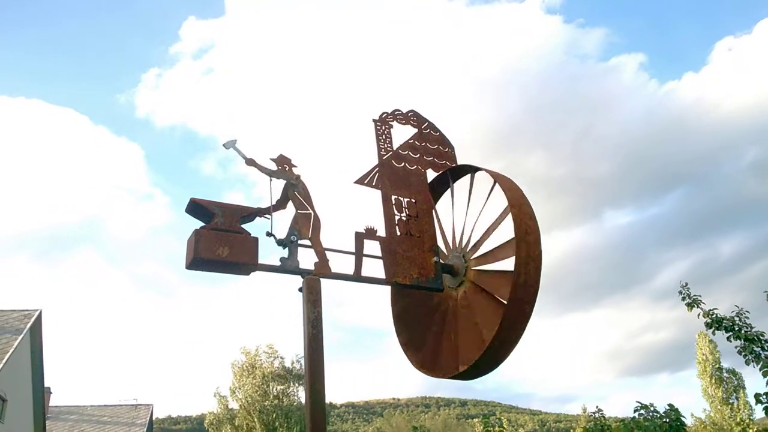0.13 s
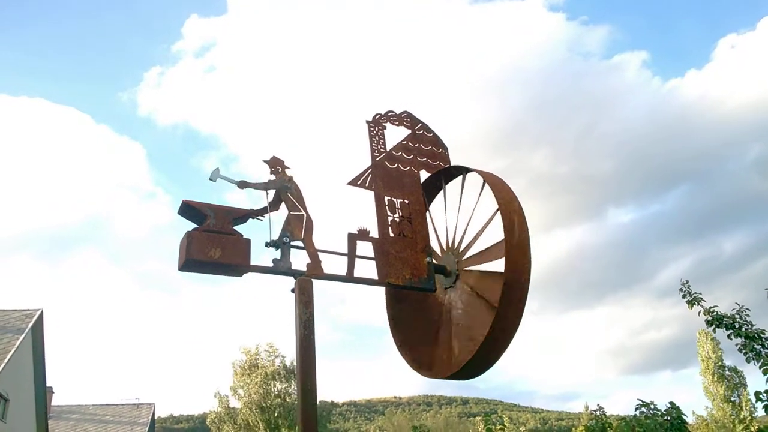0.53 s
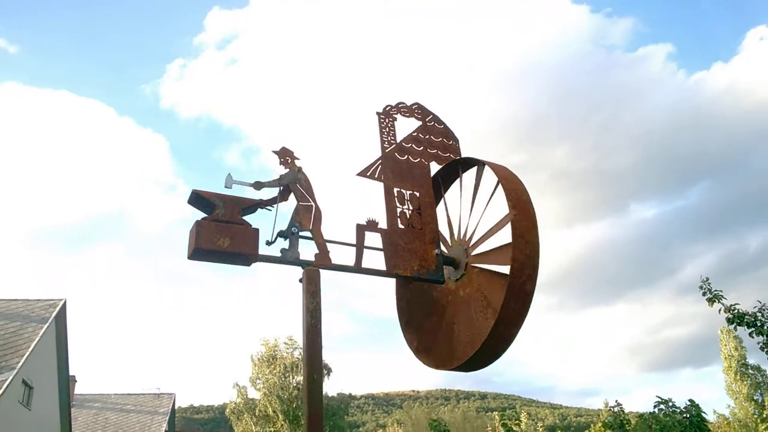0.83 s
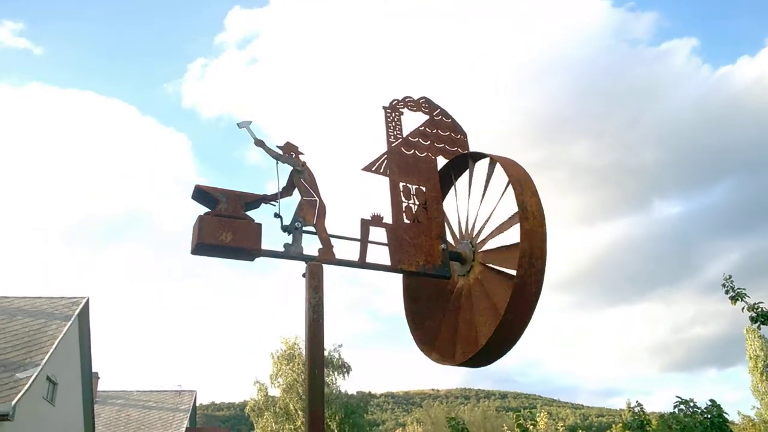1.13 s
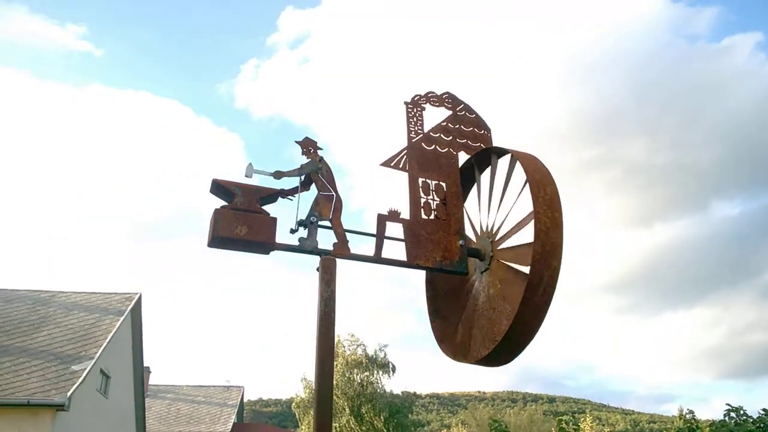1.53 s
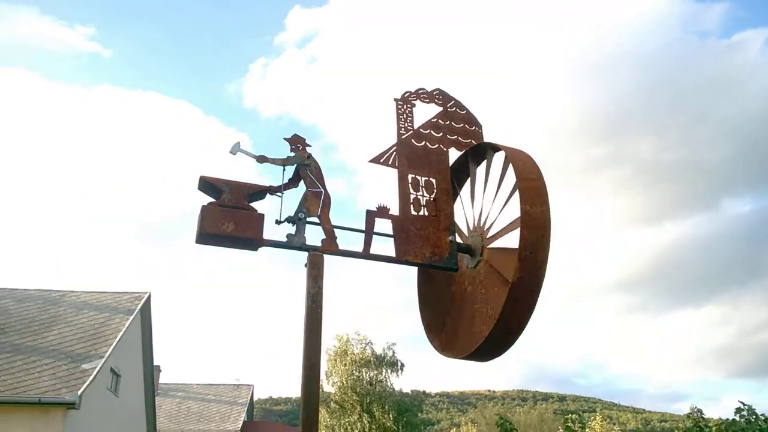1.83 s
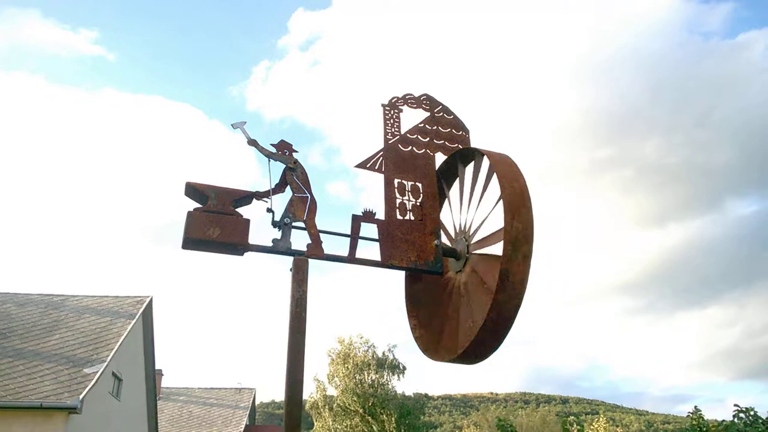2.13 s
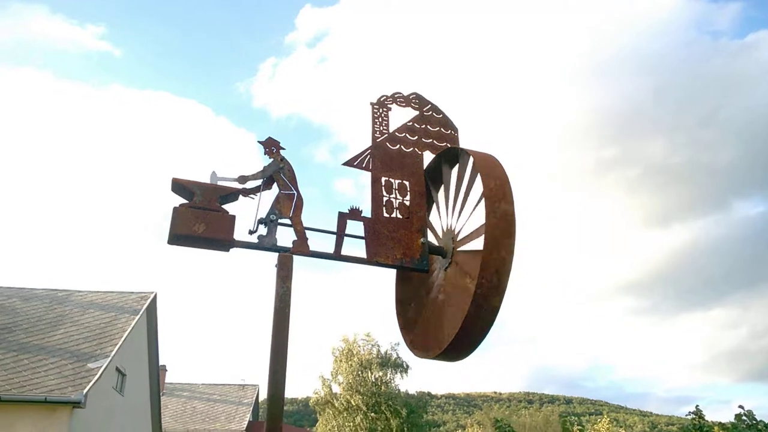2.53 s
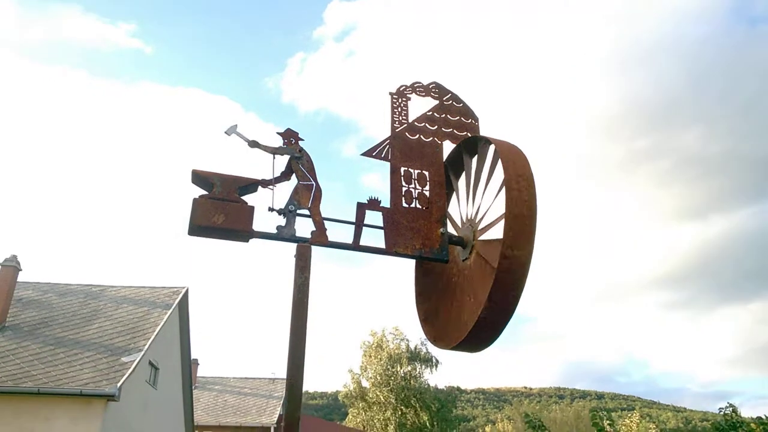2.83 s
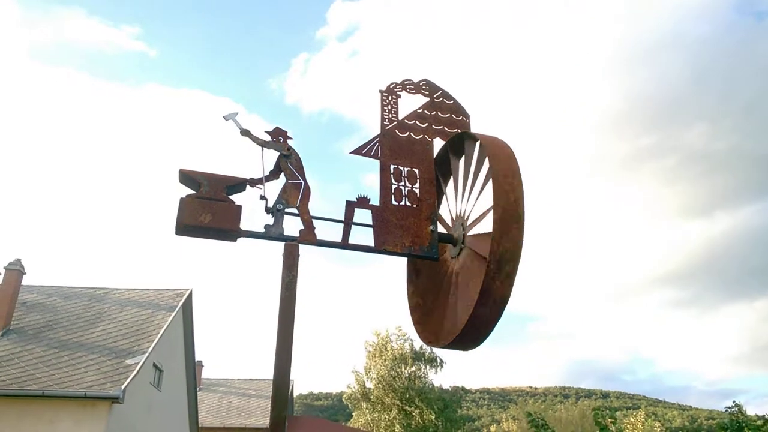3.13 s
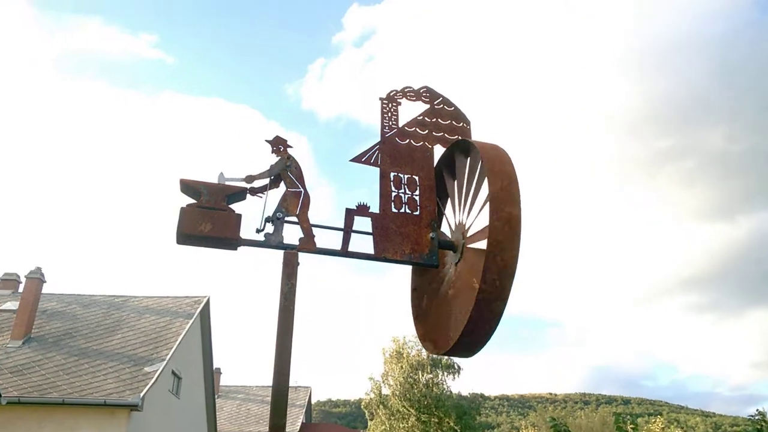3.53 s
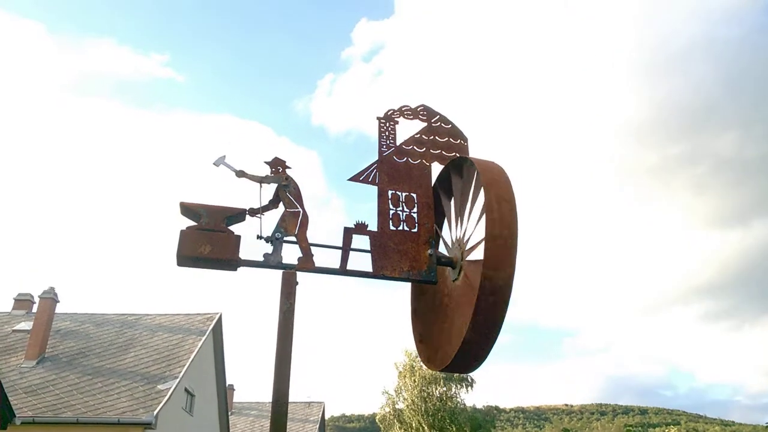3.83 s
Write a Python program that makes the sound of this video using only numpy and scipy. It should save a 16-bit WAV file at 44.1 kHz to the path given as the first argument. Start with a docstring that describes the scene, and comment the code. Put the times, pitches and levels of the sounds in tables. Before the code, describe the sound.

Gusty wind rumbles on the microphone while a rusty wind-driven garden ornament squeaks faintly.

```python
"""Gusty wind buffets the microphone in a garden and dies down: rumble, eddies, thumps, one burble.
A rusty wind-driven ornament turns about once a second: its crank scrapes faintly, then squeaks
on two close notes. Once its loose linkage ticks. Walls and trees echo the ornament faintly.
Leaves hiss softly behind."""
import sys
import numpy as np
from scipy import signal
from scipy.fft import rfft, irfft
from scipy.io import wavfile
from scipy.ndimage import uniform_filter1d

SR = 44100
rng = np.random.default_rng(int(sys.argv[2]) if len(sys.argv) > 2 else 0)


def generate_wav(signal):
    """Clip the signal to [-1, 1] and save it as 16-bit WAV at the path in sys.argv[1]."""
    frames = np.transpose(np.atleast_2d(signal))
    scaled = np.clip(frames, -1, 1) * 32767
    pcm = np.round(scaled).astype(np.int16)
    wavfile.write(sys.argv[1], SR, pcm)


N = 176400

# wind strength at the microphone (time [s], level [dB])
WIND_LEVEL = [(0, -25), (.05, -22.5), (.23, -20.5), (.28, -17), (.58, -17), (.62, -33.5), (.7, -19),
              (.76, -27), (.81, -17.5), (.88, -23.5), (1.35, -24.5), (1.44, -32.5), (1.68, -37),
              (1.75, -19.5), (1.89, -18.5), (1.96, -22), (2.25, -35.5), (2.31, -19), (2.38, -29.5),
              (2.58, -23), (2.8, -29.5), (2.85, -25), (3.08, -26.5), (3.12, -43.5), (3.42, -47.5),
              (3.53, -34), (3.72, -48), (3.82, -49.5), (4, -58)]
# wind rumble (frequency [Hz], relative density [dB])
RUMBLE_SPECTRUM = [(8, -53), (22, -6.5), (38, 9), (70, 0), (100, -5.5), (150, -23.5), (250, -33),
                   (500, -51), (1000, -107.5)]
# wind flutter (frequency [Hz], relative density [dB])
FLUTTER_SPECTRUM = [(30, -5), (90, 3), (150, 22.5), (250, -35.5), (400, -17), (700, -52.5), (1500, -89)]
# eddies hitting the microphone (centre [s], half-width [s], level [dB])
EDDIES = [(0.045, 0.075, -20), (0.265, 0.036, -21.5), (0.338, 0.073, -19.5), (0.451, 0.037, -16.5),
          (0.525, 0.037, -18.5), (0.575, 0.025, -16.5), (0.696, 0.03, -14.5), (0.729, 0.019, -19.5),
          (0.815, 0.048, -20.5), (0.944, 0.012, -19.5), (1.134, 0.013, -22.5), (1.175, 0.026, -19),
          (1.219, 0.01, -20.5), (1.319, 0.046, -28), (1.392, 0.014, -28), (1.503, 0.012, -29),
          (1.745, 0.027, -30), (1.849, 0.014, -22), (1.879, 0.026, -16), (1.909, 0.038, -22),
          (2.008, 0.035, -23.5), (2.086, 0.0064, -23.5), (2.291, 0.018, -26), (2.316, 0.0091, -28.5),
          (2.452, 0.025, -29.5), (2.566, 0.015, -22), (2.859, 0.027, -25), (2.958, 0.036, -31),
          (3.062, 0.056, -40)]
# eddy before its low-pass (frequency [Hz], relative density [dB])
EDDY_SPECTRUM = [(12, -11), (35, 1), (65, -1.5), (105, 1.5), (160, -4), (230, -8.5), (380, -13.5),
                 (520, -16), (900, -15)]
# pressure swings of the sharpest eddies (centre [s], peak [dB], strongest frequency [Hz])
PRESSURE_SWINGS = [(-.0015, -11.5, 59.6), (.041, -10.5, 71.4), (.453, -11.5, 107.5), (.571, -8, 102),
                   (.701, -9, 85), (2.594, -18.5, 78), (2.851, -17.5, 54), (2.911, -19, 68)]
# air across the microphone port (frequency [Hz], relative density [dB])
BURBLE_SPECTRUM = [(160, -30), (280, 7), (440, -3), (900, -29.5), (1500, -68)]
# crank squeaks (centre [s], half-width [s], high note [dB], low note [dB], low note lead [s])
CRANK_SQUEAKS = [(.008, 0.04, -49, -62, .027), (0.903, .034, -44, -52.5, .058),
                 (1.802, 0.041, -42.5, -57.5, 0.043), (2.739, 0.038, -50.5, -56.5, 0.048),
                 (3.729, 0.019, -55, -61, 0.045)]
# crank scrapes (centre [s], half-width [s], level [dB])
CRANK_SCRAPES = [(.7, 0.13, -56.5), (1.625, .105, -56), (2.55, .1, -58.5), (3.52, 0.18, -61.5)]
# linkage ring (frequency [Hz], relative level [dB], T60 [s])
LINKAGE_MODES = [(780, -3, .035), (1470, -10, 0.046), (2750, -9, 0.025), (3650, -7.5, 0.016),
                 (3710, -2, 0.043), (4010, 8.5, 0.011)]
# linkage impact (frequency [Hz], relative density [dB])
CRACK_SPECTRUM = [(400, -19), (800, 24.5), (2000, -2), (4200, -3), (7000, -41), (12000, -62)]
# leaf hiss (frequency [Hz], relative density [dB])
LEAF_SPECTRUM = [(30, 10.5), (90, 8), (300, 4.5), (600, 2), (1000, 0), (1400, -1.5), (1850, 3), (2400, -1),
                 (2900, -4), (3700, 1.5), (4500, -1), (5600, -3), (6800, -10.5), (8300, -16), (9300, -20.5),
                 (12000, -23), (15500, -29)]
# leaf hiss (time [s], level [dB])
LEAF_LEVEL = [(0, -52), (.4, -53.5), (.8, -53.5), (1.6, -55), (2.4, -55.5), (3.1, -55), (3.55, -55.5),
              (3.9, -57), (4, -56)]
# leaf taps (frequency [Hz], relative density [dB])
TAP_SPECTRUM = [(1500, -1), (4000, 8), (7000, -9.5), (11000, -13), (16000, -19.5)]

BREEZE_DB = -22  # reference level for flutter and eddies


def amp(db):
    """Decibels to gain."""
    return 10 ** (np.asarray(db) / 20)


def unit(x):
    """Scale to rms 1."""
    return x / np.sqrt(np.mean(x ** 2) + 1e-30)


def clock():
    """Sample times [s]."""
    return np.arange(N) / SR


def curve(points):
    """Straight lines through (time [s], value) points."""
    return np.interp(clock(), *np.transpose(points))


def spectrum_gain(spectrum, hz):
    """Gain at hz of a (frequency [Hz], level [dB]) table."""
    knots_hz, db = np.transpose(spectrum)
    return amp(np.interp(np.log(hz + 1), np.log(knots_hz), db))


def shaped(x, spectrum):
    """Filter by a spectrum; rms 1."""
    return unit(irfft(rfft(x) * spectrum_gain(spectrum, np.fft.rfftfreq(N, 1 / SR)), N))


def noise(spectrum):
    """Coloured noise, rms 1."""
    return shaped(rng.standard_normal(N), spectrum)


def drift(rate_hz):
    """Low-passed random motion, rms 1."""
    hz = np.fft.rfftfreq(N, 1 / SR)
    return unit(irfft(rfft(rng.standard_normal(N)) * np.exp(-(hz / rate_hz) ** 2), N))


def steadied(x, samples):
    """Even out slow level changes."""
    return x / np.sqrt(abs(uniform_filter1d(uniform_filter1d(x ** 2, samples), samples)) + 1e-12)


def bell(x, centre, half_width):
    """Gaussian, peak 1; 1/e^2 at half_width."""
    return np.exp(-np.minimum(2 * ((x - centre) / half_width) ** 2, 100))


def add(mix, start_s, sound):
    """Mix a sound in at start_s."""
    at = round(start_s * SR)
    sound = sound[max(-at, 0):]
    part = mix[max(at, 0):][:len(sound)]
    part += sound[:len(part)]


def wind(rumble_flicker_db=5, flutter_flicker_db=1.5, flutter_db=-47, flutter_growth=1.08):
    """Deep rumble follows the wind in uneven lumps; a higher flutter grows faster with it."""
    level_db = curve(WIND_LEVEL)
    lumps = np.clip(drift(rate_hz=18.5), -2, 1.3)
    rumble = steadied(noise(RUMBLE_SPECTRUM) * amp(rumble_flicker_db * lumps), samples=4000)
    flutter = steadied(noise(FLUTTER_SPECTRUM) * amp(flutter_flicker_db * lumps), samples=5000)
    return rumble * amp(level_db) + flutter * amp(flutter_db + flutter_growth * (level_db - BREEZE_DB))


def buffets(crossover_hz=285, crest_share=.55, breeze_cutoff_hz=255.2, db_per_octave=15, samples=16384):
    """Each eddy: a deep pressure lump with a shorter, brighter crest. Stronger ones reach higher."""
    out = np.zeros(N)
    t, hz = (np.arange(samples) - samples // 2) / SR, np.fft.rfftfreq(samples, 1 / SR)
    colour = spectrum_gain(EDDY_SPECTRUM, hz)
    highpass = hz ** 2 / (hz ** 2 + crossover_hz ** 2)
    for centre_s, width_s, db in EDDIES:
        cutoff_hz = breeze_cutoff_hz * 2 ** ((db - BREEZE_DB) / db_per_octave)
        air = rng.standard_normal(samples)
        body, crest = bell(t, 0, width_s), bell(t, 0, width_s * crest_share)
        push = rfft(air * body) * (1 - highpass) + rfft(air * crest) * highpass
        lump = irfft(push * colour / np.hypot(1, (hz / cutoff_hz) ** 4))
        add(out, centre_s + t[0], amp(db) * lump * np.linalg.norm(body) / np.linalg.norm(lump))
    return out


def thumps():
    """The sharpest eddies break on the microphone in one pressure swing: suction, then push."""
    out = np.zeros(N)
    for centre_s, db, hz in PRESSURE_SWINGS:
        phase = 2 * np.pi * hz * (clock() - centre_s)
        swing = phase / (1 + phase ** 2) ** 2
        out += amp(db) * swing / swing.max()
    return out


def burble(centre_s=1.876, width_s=.014, level_db=-20):
    """The hardest gust flutters briefly across the microphone port."""
    air = steadied(noise(BURBLE_SPECTRUM), samples=600)
    return amp(level_db) * air * bell(clock(), centre_s, width_s)


def squeal(hz, waver_hz):
    """Wavering tone of dry metal, rms 1."""
    return unit(np.sin(2 * np.pi * np.cumsum(hz + waver_hz * drift(rate_hz=74.7)) / SR))


def crank_scrapes(top_hz=4385, sag_hz=166.8, band_hz=148, tone_db=-2, flicker_db=3.5):
    """The rusty crank rubs and catches: narrow-band noise plus a squeal arching in pitch."""
    t, hz = clock(), np.fft.rfftfreq(N, 1 / SR)
    envelope = sum(amp(db) * bell(t, s, width_s) for s, width_s, db in CRANK_SCRAPES)
    arch = sum(bell(t, s, width_s) for s, width_s, _ in CRANK_SCRAPES)
    band = 1 / (1 + ((hz - top_hz + sag_hz / 4) / band_hz) ** 2)
    rub = unit(irfft(rfft(rng.standard_normal(N)) * band, N))
    tone = amp(tone_db) * squeal(top_hz - sag_hz * (1 - arch), waver_hz=48)
    catching = amp(flicker_db * np.minimum(drift(rate_hz=55), 1))
    return envelope * unit((rub + tone) * catching)


def crank_squeaks(high_hz=4293, low_hz=4178, overtone_hz=8200, overtone_db=-80, low_width_s=.062):
    """Each turn squeaks: a low note with a thin near-octave, then a clear higher note."""
    t = clock()
    high, low, overtone = np.zeros((3, N))
    for centre_s, width_s, high_db, low_db, lead_s in CRANK_SQUEAKS:
        early = bell(t, centre_s - lead_s, low_width_s)
        high += amp(high_db) * bell(t, centre_s, width_s)
        low += amp(low_db) * early
        overtone += amp(overtone_db) * early
    return (high * squeal(high_hz, waver_hz=17) + low * squeal(low_hz, waver_hz=17)
            + overtone * squeal(overtone_hz, waver_hz=34))


def linkage_tick(start_s=.7714, rise_s=.00099, ring_db=-36.5, crack_db=-34.5, crack_decay_s=.0047):
    """Loose iron parts knock once and ring briefly."""
    out, t = np.zeros(N), np.arange(SR // 10) / SR
    ring = sum(amp(db - 60 * t / t60_s) * np.sin(2 * np.pi * (hz * t + rng.random()))
               for hz, db, t60_s in LINKAGE_MODES)
    crack = noise(CRACK_SPECTRUM)[:len(t)] * np.exp(-t / crack_decay_s)
    knock = amp(ring_db) * ring + amp(crack_db) * crack
    add(out, start_s, knock * (1 - bell(t, 0, rise_s)))
    return out


def garden_echo(x, echo_db=-14, t60_s=.5, delay_s=.015):
    """Direct sound plus faint scatter from walls and trees."""
    t = np.arange(SR // 2) / SR
    tail = rng.standard_normal(len(t)) * amp(-60 * t / t60_s) * (t > delay_s)
    return x + amp(echo_db) * signal.fftconvolve(x, tail / np.linalg.norm(tail))[:N]


def leaf_hiss(patch_db=.89, flicker_db=.6, brightening=.35, fall_db=-5, fall_start_s=3.05, fall_s=.5):
    """Foliage hisses in drifting patches, brighter when louder; its low roar sinks as the wind drops."""
    hz, t, bins = signal.stft(rng.standard_normal(N), SR, nperseg=512, noverlap=384)
    patches = uniform_filter1d(rng.standard_normal(bins.shape), size=7, axis=0)
    patches = unit(uniform_filter1d(patches, size=26, axis=1))
    level_db = np.interp(t, *np.transpose(LEAF_LEVEL))
    treble, bass = 1 - bell(hz, 0, 14000), bell(hz, 0, 1800)
    fizz_db = np.outer(treble, brightening * (level_db - level_db.mean()))
    roar_db = np.outer(bass, fall_db * np.clip((t - fall_start_s) / fall_s, 0, 1))
    bins *= amp(patch_db * patches + fizz_db + roar_db)
    hiss = signal.istft(bins, nperseg=512, noverlap=384)[1][:N]
    return shaped(hiss, LEAF_SPECTRUM) * amp(curve(LEAF_LEVEL) + flicker_db * drift(rate_hz=11))


def leaf_taps(taps_per_s=62, decay_s=.00067, level_db=-73.5):
    """Nearer leaves tap at random: tiny noise bursts."""
    hits = (rng.random(N) < taps_per_s / SR) * np.minimum(rng.exponential(1, N), 3)
    envelope = signal.lfilter([1], [1, -np.exp(-1 / (decay_s * SR))], hits)
    return amp(level_db) * shaped(envelope * rng.standard_normal(N), TAP_SPECTRUM)


def scene():
    """Wind on the microphone, ornament and leaves; mono."""
    gusts = wind() + buffets() + thumps() + burble()
    leaves = leaf_hiss() + leaf_taps()
    ornament = crank_scrapes() + crank_squeaks() + linkage_tick()
    return (gusts + garden_echo(ornament) + leaves)[None]


def record(dry):
    """Recorder band limit."""
    cutoff_hz = 15750
    lowpass = signal.firwin(511, cutoff_hz, window=("kaiser", 9), fs=SR)
    return signal.oaconvolve(dry, lowpass[None], "same")


dry = scene()
out = record(dry)
generate_wav(out)
```